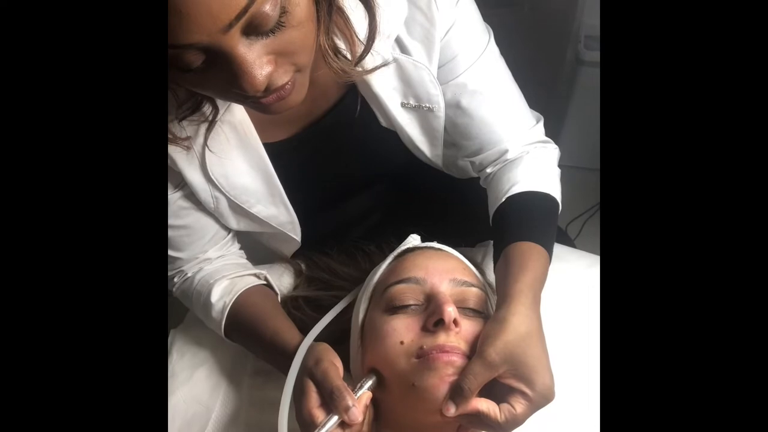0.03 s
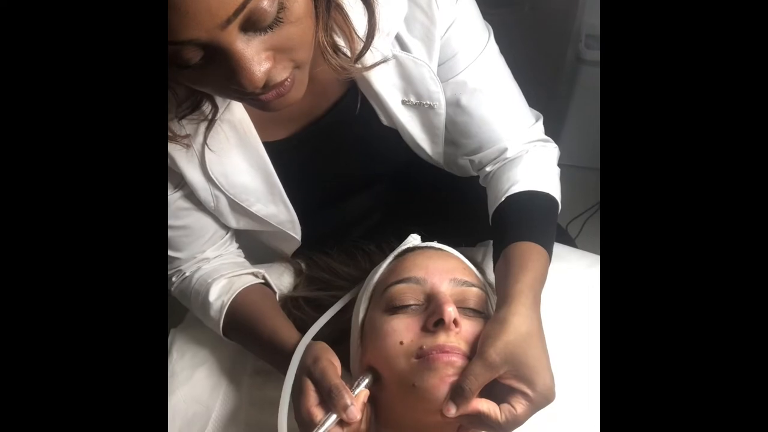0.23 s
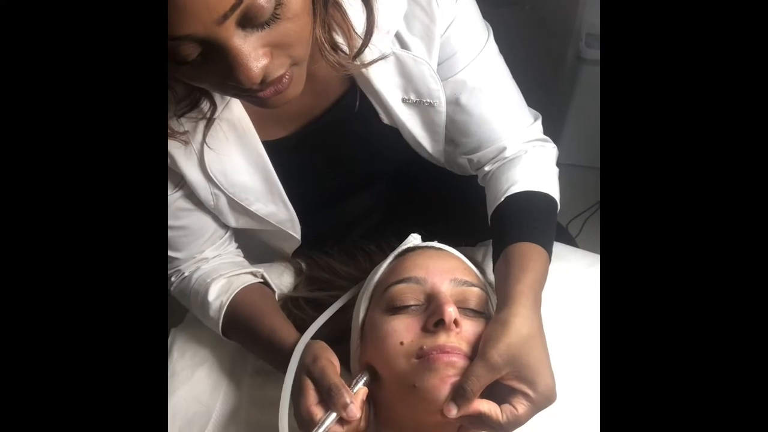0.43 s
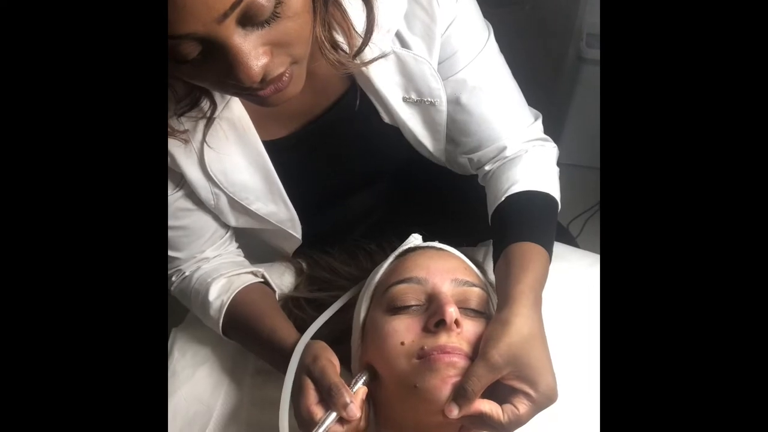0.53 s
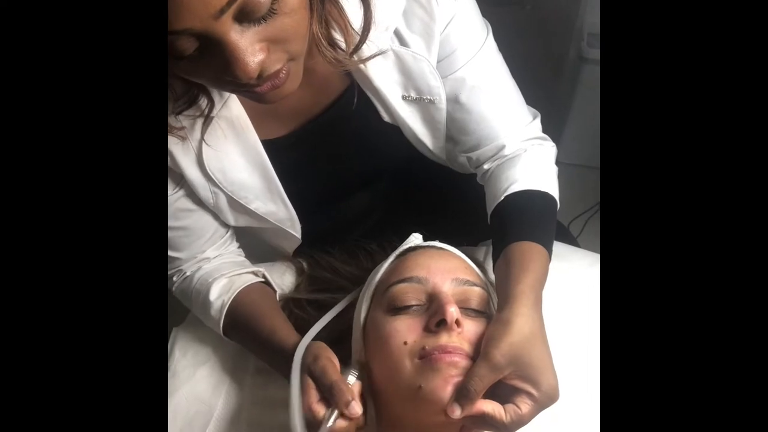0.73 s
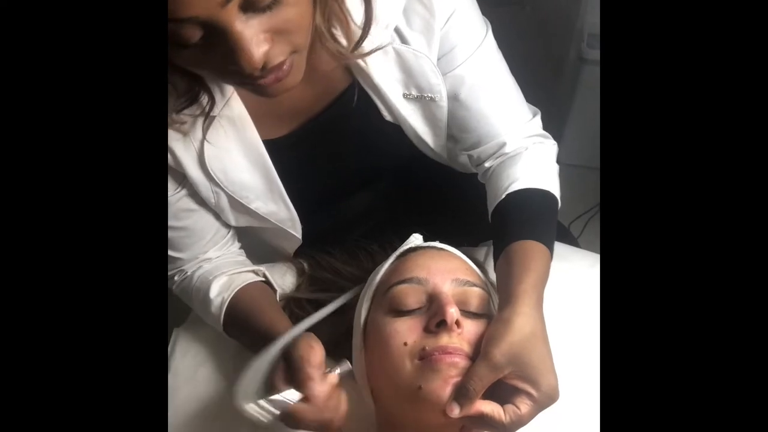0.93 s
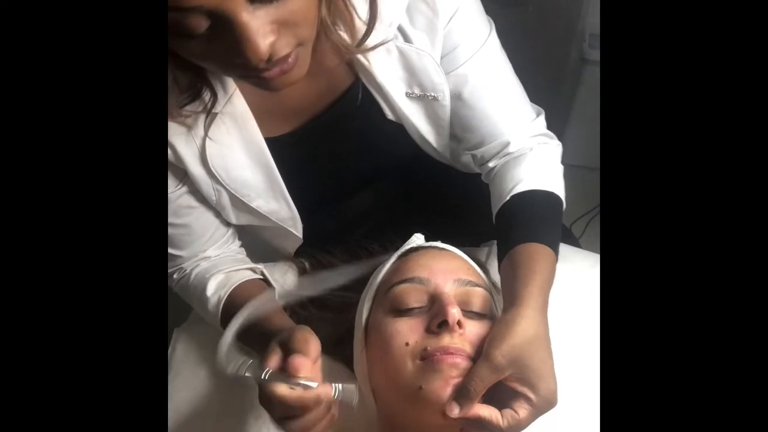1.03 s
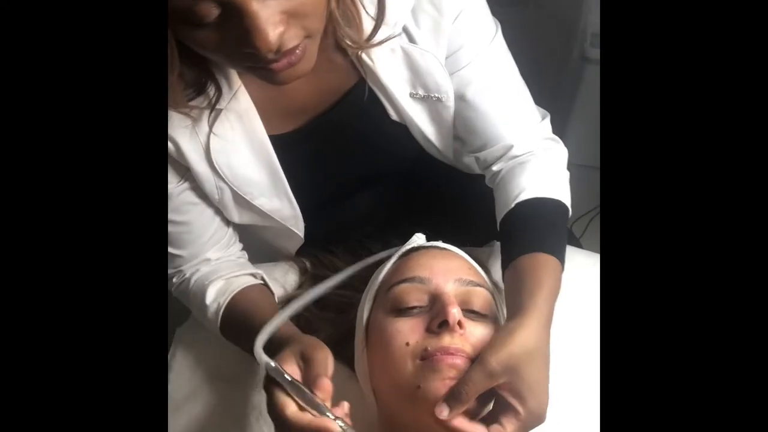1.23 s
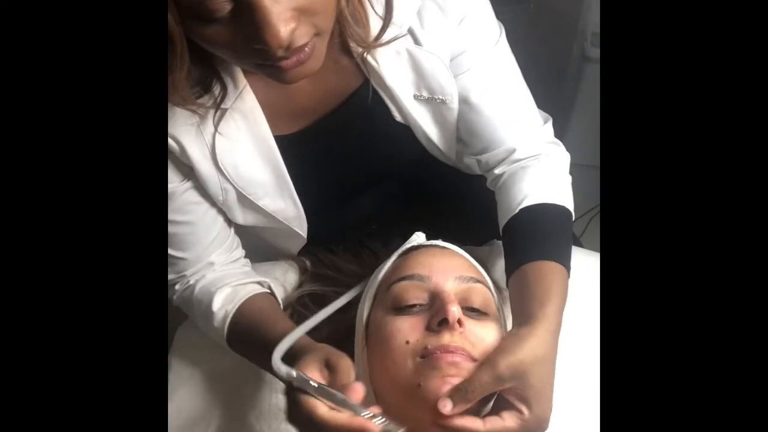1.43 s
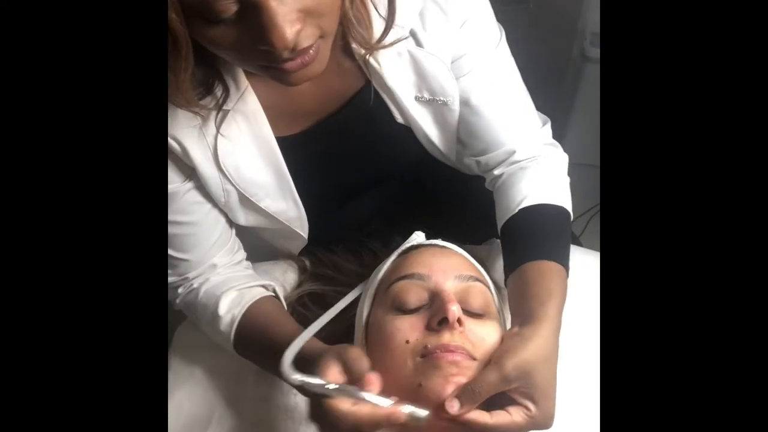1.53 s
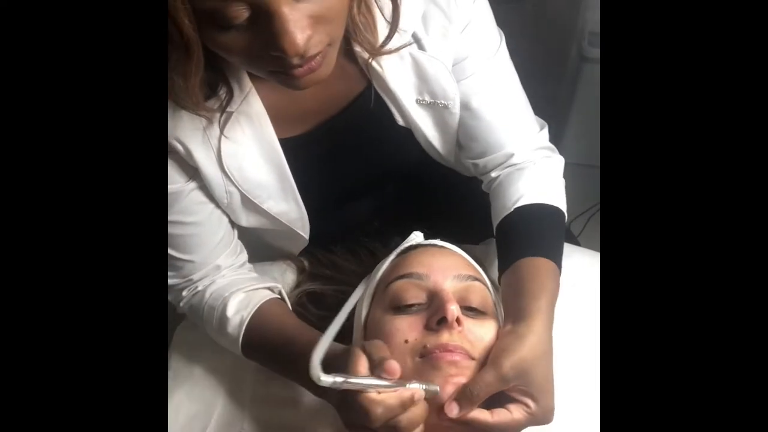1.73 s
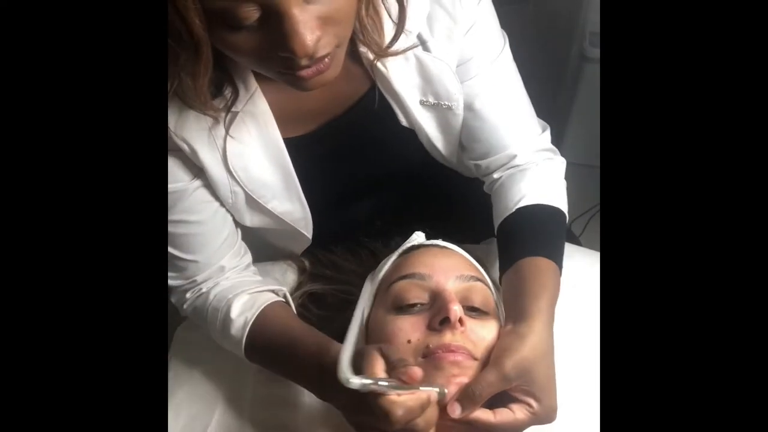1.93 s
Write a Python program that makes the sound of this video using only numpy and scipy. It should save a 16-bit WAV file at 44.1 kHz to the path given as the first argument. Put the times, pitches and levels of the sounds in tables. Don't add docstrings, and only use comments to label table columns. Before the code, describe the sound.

A small vacuum pump drones low and steady in a treatment room, close to the microphone; partway through, a suction wand releases from skin with a tick, pop and brief hiss, then faint fluttering puffs of air.

```python
import sys
import numpy as np
from scipy import signal
from scipy.fft import rfft, irfft
from scipy.io import wavfile
from scipy.ndimage import uniform_filter1d

SR = 44100
rng = np.random.default_rng(int(sys.argv[2]) if len(sys.argv) > 2 else 0)


def file_out(sig):
    cols = np.atleast_2d(sig).T
    lim = np.clip(cols, -1, 1)
    pcm = np.round(lim * 32767).astype(np.int16)
    wavfile.write(sys.argv[1], SR, pcm)


def decibels_to_gain(level_db):
    exponent = np.asarray(level_db, float) / 20
    return 10 ** exponent


N = 88200
T = np.arange(N) / SR
HUM_HZ = 119.98
RELEASE_S, SETTLE_S = .768, .21


def evened(x):
    return x / np.sqrt(np.mean(x ** 2) + 1e-20)


def curve(rows):
    time_s, value = np.transpose(rows)
    return np.interp(T, time_s, value)


def tone(hz):
    return np.sin(2 * np.pi * (hz * T + rng.random()))


def bell(centre_s, length_s, power=2):
    return np.exp(-((T - centre_s) / length_s) ** power)


def coloured(points):
    point_hz, point_db = np.transpose(points)
    hz = np.fft.rfftfreq(N, 1 / SR)
    gain_db = np.interp(np.log(hz + 1), np.log(point_hz), point_db, left=-90)
    return evened(irfft(rfft(rng.standard_normal(N)) * decibels_to_gain(gain_db), N))


def slow(rate_hz, depth_db):
    hz = np.geomspace(.6, rate_hz, 6)[:, None]
    coarse_t = T[::400]
    wander = (np.sin(2 * np.pi * (hz * coarse_t + rng.random((6, 1)))) / hz ** .042).sum(0)
    return np.interp(T, coarse_t, decibels_to_gain(depth_db * evened(wander)))


def resonate(x, hz, width_hz):
    turn = np.exp(2j * np.pi * np.cumsum(hz + 0 * T) / SR)
    r = np.exp(-np.pi * width_hz / SR)
    return 2 * (turn * signal.lfilter([1 - r], [1, -r], x / turn)).real


def ring(x, hz, width_hz):
    offset_hz = np.fft.rfftfreq(N, 1 / SR) - hz
    return evened(irfft(rfft(x) / (1 + 2j * offset_hz / width_hz) / (1 + 1j * offset_hz / width_hz), N))


def opened():
    return np.clip((T - RELEASE_S) / SETTLE_S, 0, 1)


def flutter():
    return decibels_to_gain(1.4 * evened(uniform_filter1d(rng.standard_normal(N), size=130)))


# time_s, speed_rev_per_s
SPEED = [(0, 40.62), (.3, 40.7), (.76, 40.7), (.95, 40.3), (1.1, 40.26), (1.4, 40.42), (1.6, 40.36),
         (2, 40.15)]
STROKE_AT_S = 1.035


def strokes():
    turns = np.cumsum(curve(SPEED)) / SR
    return turns - turns[round(STROKE_AT_S * SR)]


# time_s, level_db
DRONE = [(0, -48), (.15, -47), (.42, -50), (.62, -47), (.8, -49), (1.1, -50), (1.35, -45), (1.7, -45.5),
         (1.85, -48), (2, -48)]
# time_s, level_db
HUM = [(0, -44.5), (.15, -39), (.26, -42.5), (.4, -38.5), (.5, -44), (.63, -39), (.75, -44), (.88, -38),
       (1.05, -44), (1.33, -42), (1.56, -48), (1.8, -40.5), (2, -37.5)]
THIRD_DB = -49.5


def hum():
    gains = [decibels_to_gain(curve(DRONE)), decibels_to_gain(curve(HUM)), decibels_to_gain(THIRD_DB)]
    return np.sqrt(2) * sum(g * tone(k * HUM_HZ) for k, g in enumerate(gains, 1))


# pitch_hz, level_db
FAN = [(148, -66.5), (229, -66)]


def fan():
    return np.sqrt(2) * sum(decibels_to_gain(db) * np.sin(2 * np.pi * hz * T) for hz, db in FAN)


# shaft_order, level_db
SEALED = [(1, -34), (2, -14), (3, -18), (4, -15.5), (5, -13.5), (6, -11), (7, -20.5), (8, -21), (9, 4),
          (10, -25.5), (11, -26), (12, -20.5), (13, -19), (14, -35), (15, -25), (16, -24), (17, -19.5),
          (18, -15), (19, -25), (20, -52), (21, -24), (22, -25), (23, -27.5), (24, -27), (25, -25.5),
          (26, -25.5), (27, -32), (28, -29), (29, -51), (30, -40)]
# shaft_order, level_db
FREED = [(1, -34), (2, -16), (3, -2), (4, -16), (5, -17.5), (6, -10), (7, -23), (8, -20.5), (9, -17),
         (10, -31), (11, -21), (12, -28.5), (13, -21), (14, -39), (15, -22), (16, -23), (17, -27),
         (18, -13.5), (19, -49), (20, -35), (21, -28), (22, -27.5), (23, -41), (24, -18.5), (25, -45),
         (26, -24), (27, -22), (28, -31), (29, -24.5), (30, -37)]
# shaft_order, level_db
OPEN = [(1, -35), (2, -16.5), (3, 0), (4, -16), (5, -11), (6, 10), (7, -15), (8, -25), (9, 9), (10, -24),
        (11, -23), (12, -24), (13, -17.5), (14, -22.5), (15, -26), (16, -21), (17, -23.5), (18, -14),
        (19, -27.5), (20, -30), (21, -29), (22, -31), (23, -25), (24, -35), (25, -24), (26, -22.5),
        (27, -18), (28, -30), (29, -38), (30, -46)]
STAGES_S = [.74, .93, 1.2, 1.4]
# shaft_order, hum_partial, sealed_db, open_db, beat_lag_cycles
SIDEBANDS = [(4, 1, -66, -69, .45), (4, 2, -65, -66, .22), (5, 1, -51.5, -59, .08), (7, 2, -75, -67, .17),
             (8, 2, -68, -73, .06), (13, 3, -73, -69, -.42), (15, 5, -68, -64, .1)]
ORDERS_DB, UNDER_HUM_DB = -42.5, -29
WAVER_DB, WAVER_HZ, FULL_WAVER_ORDER = 3, 7, 9
STEADY_ORDER, STEADY_SHARE = 18, .3


def shaft_orders(turns):
    out, free = np.zeros(N), opened()
    slip = 3 * (turns - turns[0]) - HUM_HZ * T
    for k, (sealed, freed, settled) in enumerate(zip(SEALED, FREED, OPEN), 1):
        phase = k * turns + rng.random()
        if k != 3:
            depth_db = WAVER_DB * min(k / FULL_WAVER_ORDER, 1) ** 2
            if k == STEADY_ORDER:
                depth_db *= STEADY_SHARE
            stage_db = ORDERS_DB + np.array([sealed[1], freed[1], freed[1], settled[1]])
            if k in (6, 9):
                stage_db = stage_db + UNDER_HUM_DB
            gain = np.interp(T, STAGES_S, decibels_to_gain(stage_db)) * slow(WAVER_HZ, depth_db)
            out += np.sqrt(2) * gain * np.cos(2 * np.pi * phase)
        for order, partial, sealed_db, open_db, lag in SIDEBANDS:
            if order == k:
                gain = decibels_to_gain(sealed_db + (open_db - sealed_db) * free)
                out += np.sqrt(2) * gain * np.cos(2 * np.pi * (phase - partial * slip + lag))
    return out


# centre_hz, width_hz, sealed_db, freed_db, settled_db
CASING = [(1288, 230, -65, -67, -71), (1434, 160, -69.5, -69.5, -63), (1550, 125, -69.5, -71.5, -75),
          (1985, 174, -70, -65, -69), (2162, 108, -72, -71, -71.5), (2910, 660, -71, -71, -69)]
ORDER_SCATTER_DB, CASING_AIR_DB = 1.2, -4


def casing(turns):
    upper = np.zeros(N)
    for k in range(31, 80):
        gain = decibels_to_gain(ORDER_SCATTER_DB * rng.standard_normal()) * slow(7, depth_db=2.2)
        upper += gain * np.cos(2 * np.pi * (k * turns + rng.random()))
    drive = evened(upper) + decibels_to_gain(CASING_AIR_DB) * rng.standard_normal(N)
    out = np.zeros(N)
    for hz, width_hz, sealed_db, freed_db, settled_db in CASING:
        level_db = np.interp(T, STAGES_S, [sealed_db, freed_db, freed_db, settled_db])
        out += decibels_to_gain(level_db) * ring(drive, hz, width_hz)
    return out


# pitch_hz, density_db_per_hz
AIR = [(20, -29), (60, -1.5), (110, 2), (190, -4), (700, -5), (2500, -14), (6000, -19.5), (15500, -34)]
AIR_DB = -56.5


def room_air():
    return decibels_to_gain(AIR_DB) * slow(5.4, depth_db=.9) * coloured(AIR)


# pitch_hz, density_db_per_hz
LEAK = [(2500, -12), (6000, -4), (9000, 6), (13000, 8), (14900, 4), (15500, 9)]
LEAK_DB, LEAK_CLOSE_S = -65.5, .07
SEAL_HZ, SEAL_WIDTH_HZ, SEAL_DB = 15450, 350, -75


def leak():
    hiss = decibels_to_gain(LEAK_DB) * coloured(LEAK) * np.clip(1 - (T - RELEASE_S) / LEAK_CLOSE_S, 0, 1)
    edge = ring(rng.standard_normal(N), SEAL_HZ, SEAL_WIDTH_HZ)
    return hiss + decibels_to_gain(SEAL_DB) * (1 - opened()) * edge


# centre_hz, width_hz, level_db
DRAUGHT = [(3010, 140, -78.5), (4250, 940, -69), (5120, 580, -73.5), (6920, 490, -76), (9320, 510, -78.5)]


def draught():
    air = rng.standard_normal(N)
    return sum(decibels_to_gain(db) * slow(4, depth_db=3) * ring(air, hz, width_hz) for hz, width_hz, db in DRAUGHT)


# shaft_order, sealed_db, open_db
WHINE = [(32, -66, -80), (47, -72, -69), (48, -69, -65), (49, -70, -65), (52, -68, -74), (58, -80, -71)]


def valve_whine(turns):
    out, free = np.zeros(N), opened()
    for k, sealed_db, open_db in WHINE:
        gain = decibels_to_gain(sealed_db + 3 + (open_db - sealed_db) * free) * slow(6, depth_db=1.8)
        out += gain * np.cos(2 * np.pi * (k * turns + rng.random()))
    return out


PEEP_S, PEEP_LEN_S, PEEP_HZ, PEEP_DB = .23, .075, 2285, -63


def peep():
    return decibels_to_gain(PEEP_DB) * bell(PEEP_S, PEEP_LEN_S, power=4) * np.sin(2 * np.pi * PEEP_HZ * T)


# centre_s, pitch_hz, level_db, length_s
CHIRPS = [(.7745, 2250, -48, 0.0033), (0.773, 3100, -42.5, 0.00071), (0.7805, 4150, -41, 0.0023),
          (.793, 5400, -48, .003), (.783, 7750, -43, .002), (.787, 7450, -45, .002),
          (.811, 7600, -46, .002), (0.75, 4200, -58, .003), (0.97, 4100, -67, 0.0091),
          (1.008, 5900, -54, 0.0038), (1.011, 7300, -58, 0.0045), (1.006, 4100, -63, .004),
          (1.031, 5250, -53.5, 0.0054), (1.028, 4000, -57, .005), (1.058, 7500, -61, .004),
          (1.059, 3000, -62, 0.0025), (1.058, 4200, -59, .004), (1.088, 7000, -63, 0.0027),
          (1.829, 5700, -62, .003), (1.855, 3600, -63, 0.0038), (1.881, 6000, -62, .002),
          (1.929, 5300, -52, .0025), (1.924, 7300, -65, .002), (1.954, 5900, -53, .0035),
          (1.955, 3700, -62, .004), (1.98, 2400, -58, 0.0023), (1.979, 5400, -59, .003),
          (1.996, 3500, -59, .003), (1.99, 2450, -52, 0.0023)]
CHIRP_WOBBLE = .03


def lip():
    wobble = 1 + CHIRP_WOBBLE * evened(uniform_filter1d(rng.standard_normal(N), size=60))
    clock_s = np.cumsum(wobble) / SR
    return sum(decibels_to_gain(db + 1) * bell(s, length_s) * np.sin(2 * np.pi * hz * clock_s)
               for s, hz, db, length_s in CHIRPS)


# pitch_hz, density_db_per_hz
TICK = [(4000, -35), (7000, 8), (15500, -8)]
TICK_S, TICK_LEN_S, TICK_DB = .757, .00056, -49


def tick():
    return decibels_to_gain(TICK_DB) * bell(TICK_S, TICK_LEN_S) * coloured(TICK)


FIZZ_HZ, FIZZ_DB, FIZZ_FALL_DB_S = 9000, -55, 420


def fizz():
    u = T - RELEASE_S
    rise = np.clip((u + .0072) / .003, 0, 1)
    level_db = FIZZ_DB - FIZZ_FALL_DB_S * np.maximum(u - .012, 0)
    return decibels_to_gain(level_db) * rise * coloured([(5500, -25), (FIZZ_HZ, 0), (13500, 2), (15500, -2)])


# centre_hz, width_hz, level_db
TUBE = [(2180, 720, -4.5), (2900, 1700, -10), (3780, 440, 1.5), (4360, 250, -3), (5300, 130, -1),
        (7520, 860, 0), (10400, 720, -12), (14000, 2300, -26)]
# pitch_hz, density_db_per_hz
TUBE_BROAD = [(1200, 2), (2500, -4.5), (4000, 5), (7500, 3), (9000, -8), (15500, -12)]
BROAD_DB = 3


def tube(tilt_db):
    air, rung = rng.standard_normal(N), np.zeros(N)
    for k, (hz, width_hz, db) in enumerate(TUBE):
        rung += (-1) ** k * decibels_to_gain(db + tilt_db * np.log2(hz / 5000)) * ring(air, hz, width_hz)
    jet = coloured([(hz, db + tilt_db * np.log2(hz / 5000)) for hz, db in TUBE_BROAD])
    return evened(evened(rung) + decibels_to_gain(BROAD_DB) * jet)


TEAR_DB, TEAR_THROB_DB = -43, 2.5
TEAR_RISE_S, TEAR_HOLD_S, TEAR_FALL_DB_S = .0087, .015, 256
TEAR_ROOM_DB, ROOM_T60_S = -14, 1


def tear(turns):
    u = T - RELEASE_S
    fall_db = -TEAR_FALL_DB_S * np.maximum(u - TEAR_RISE_S - TEAR_HOLD_S, 0)
    shape = np.clip(u / TEAR_RISE_S, 0, 1) * decibels_to_gain(fall_db)
    throb_db = TEAR_THROB_DB * np.cos(2 * np.pi * turns)
    rush = decibels_to_gain(TEAR_DB + throb_db) * shape * flutter() * tube(tilt_db=2)
    tail_db = TEAR_DB + TEAR_ROOM_DB - 60 * abs(u) / ROOM_T60_S
    return rush + decibels_to_gain(tail_db) * np.clip(u / .015, 0, 1) * tube(tilt_db=-4)


SHRILL_HZ, SHRILL_WIDTH_HZ, SHRILL_DB, SHRILL_S = 7800, 560, -49, .069


def shrill():
    u = np.clip((T - RELEASE_S) / SHRILL_S, 0, 1)
    edge = ring(rng.standard_normal(N), SHRILL_HZ, SHRILL_WIDTH_HZ)
    return decibels_to_gain(SHRILL_DB) * np.sin(np.pi * u ** .6) * edge


POP_S, POP_HZ, POP_DB, POP_T60_S = .7733, 3500, -28, .009


def pop():
    p = np.maximum(T - POP_S, 0)
    envelope = decibels_to_gain(POP_DB - 60 * p / POP_T60_S) * np.minimum(p / .0008, 1)
    return envelope * np.sin(2 * np.pi * POP_HZ * p * (1 + 12 * p))


# time_s, level_db
GULP = [(.9, -73), (.98, -60.5), (1.01, -54), (1.035, -54), (1.06, -55), (1.085, -73), (1.22, -65),
        (1.32, -60.5), (1.44, -70), (1.76, -68), (1.85, -60), (1.93, -57.5), (2, -56)]
# time_s, pitch_hz
TIP = [(0, 5250), (1.8, 5300), (1.96, 5900), (2, 5600)]
TIP_WIDTH_HZ, TIP_DB = 600, -12
GULP_SHARP, GULP_TILT_DB, GULP_FLOOR = 1.7, -2, .15


def gulps(turns):
    gate = GULP_FLOOR + np.exp(GULP_SHARP * (np.cos(2 * np.pi * turns) - 1))
    tip_hz = curve(TIP)
    whistle = resonate(rng.standard_normal(N), tip_hz, TIP_WIDTH_HZ)
    whistle = evened(resonate(whistle, tip_hz, TIP_WIDTH_HZ))
    return decibels_to_gain(curve(GULP)) * gate * flutter() * (tube(GULP_TILT_DB) + decibels_to_gain(TIP_DB) * whistle)


# pitch_hz, density_db_per_hz
LEAN = [(100, -14), (165, 21), (250, -2), (600, -5), (2500, -44)]
LEAN_DB, LEAN_S, LEAN_RISE_S = -47, 1.8, .2


def cloth():
    return decibels_to_gain(LEAN_DB) * np.clip((T - LEAN_S) / LEAN_RISE_S, 0, 1) * coloured(LEAN)


SQUEAK_S, SQUEAK_HZ, SQUEAK_DB, SQUEAK_LEN_S = 1.99, 2500, -66, .005


def squeak():
    rub = evened(resonate(rng.standard_normal(N), SQUEAK_HZ, 200))
    return decibels_to_gain(SQUEAK_DB) * bell(SQUEAK_S, SQUEAK_LEN_S) * rub


def scene():
    turns = strokes()
    pump = hum() + fan() + shaft_orders(turns) + casing(turns) + valve_whine(turns)
    sealed = leak() + draught() + peep()
    release = lip() + tick() + fizz() + tear(turns) + shrill() + pop()
    free = gulps(turns) + squeak()
    return (pump + room_air() + sealed + release + free + cloth())[None]


def top_cut(x):
    return signal.sosfilt(signal.butter(12, 15740, fs=SR, output="sos"), x)


EDGE_HZ = 15740


def record(dry):
    lowpass = signal.firwin(511, EDGE_HZ, window=("kaiser", 9), fs=SR)
    mix = signal.oaconvolve(dry, lowpass[None], "same")
    return top_cut(mix)


dry = scene()
out = record(dry)
file_out(out)
```